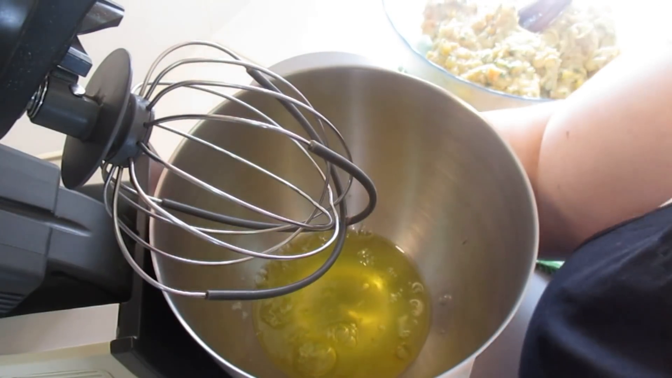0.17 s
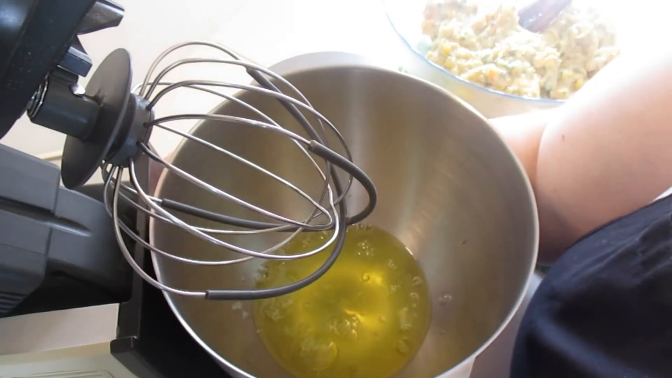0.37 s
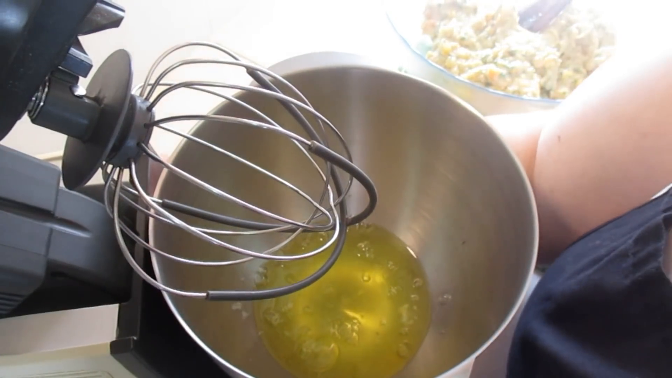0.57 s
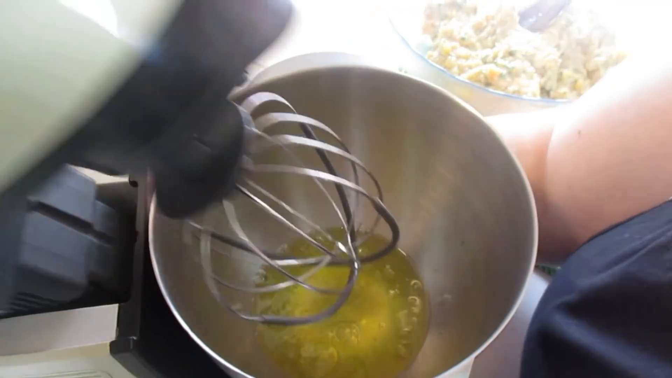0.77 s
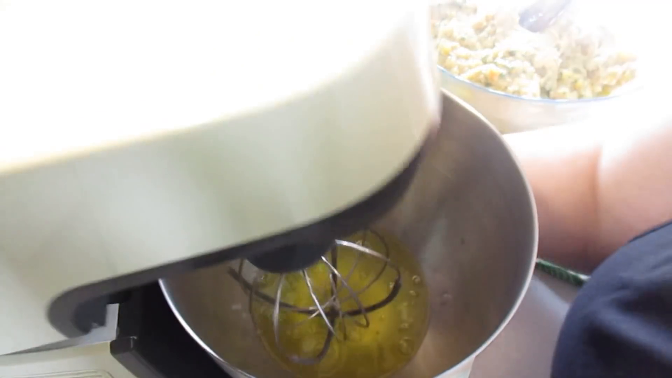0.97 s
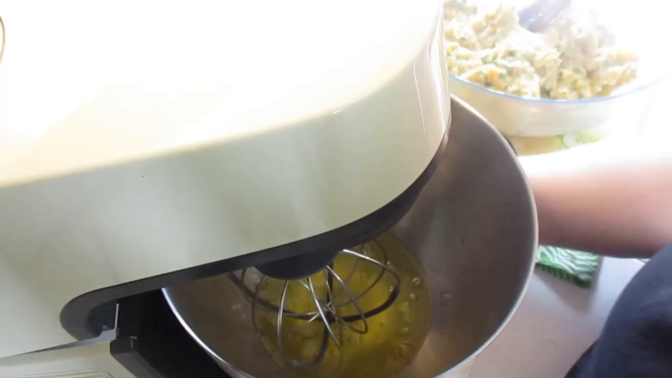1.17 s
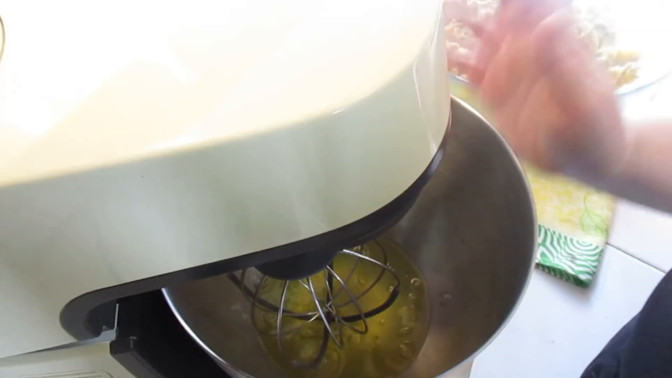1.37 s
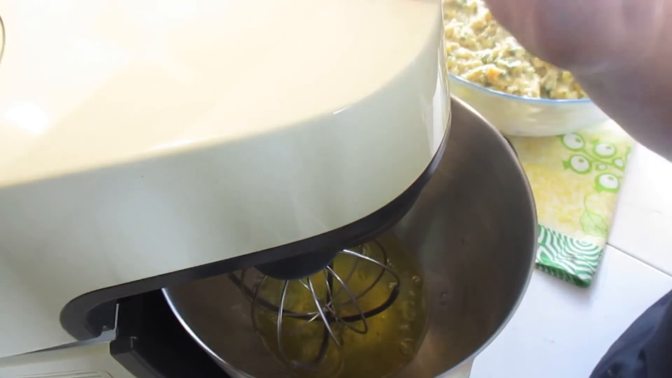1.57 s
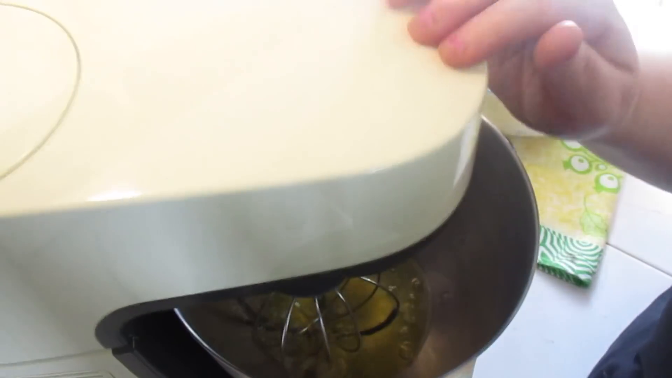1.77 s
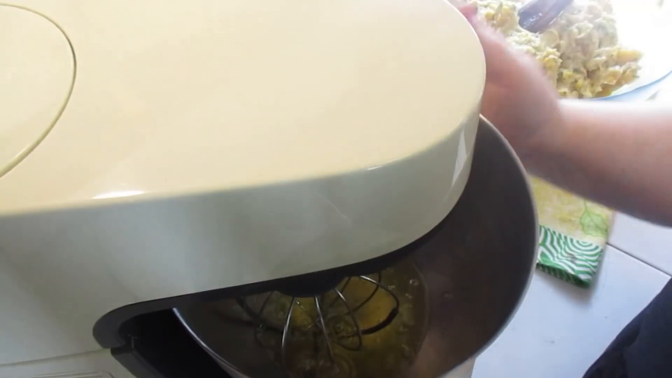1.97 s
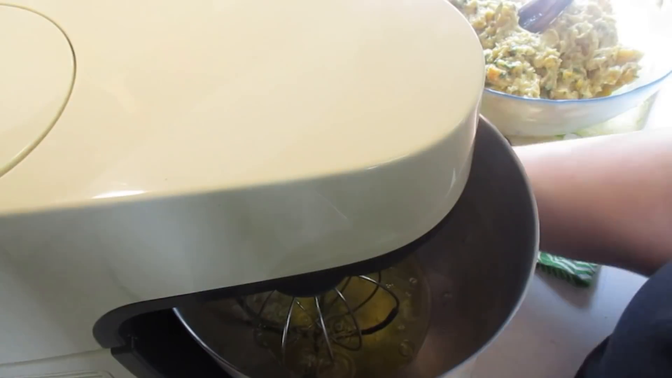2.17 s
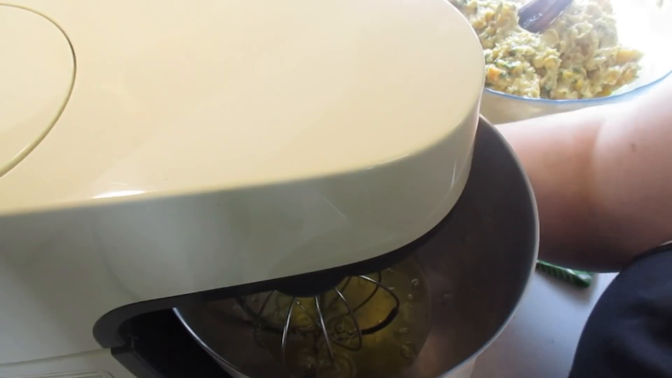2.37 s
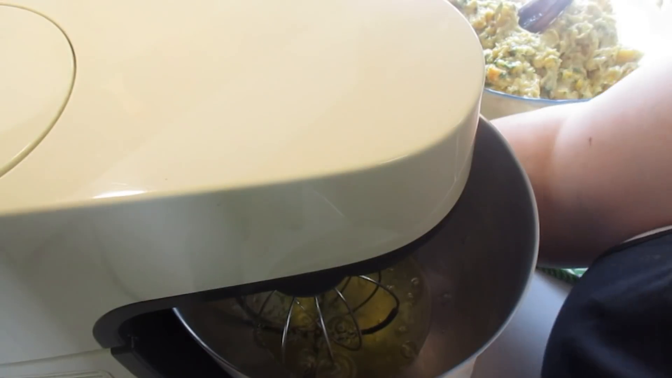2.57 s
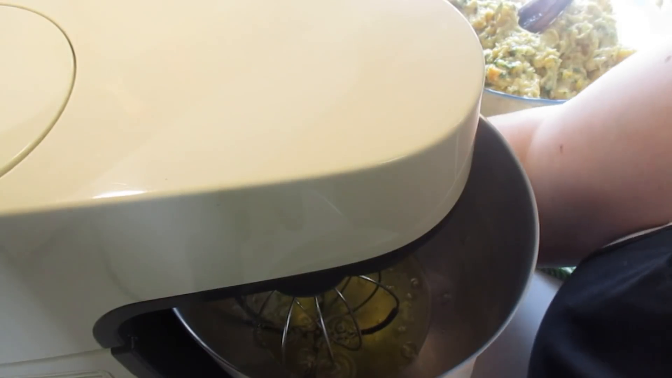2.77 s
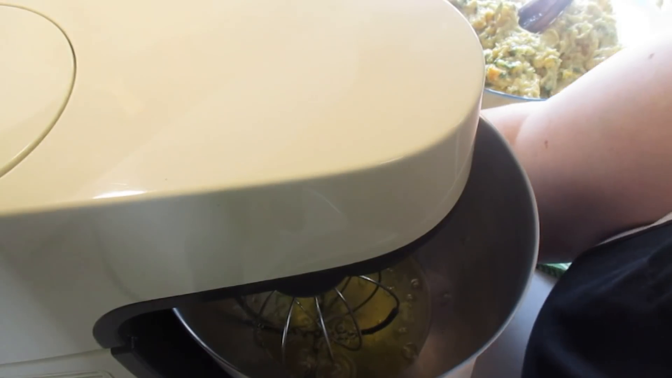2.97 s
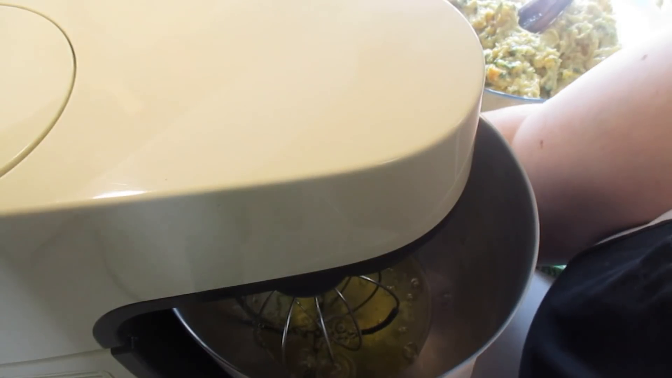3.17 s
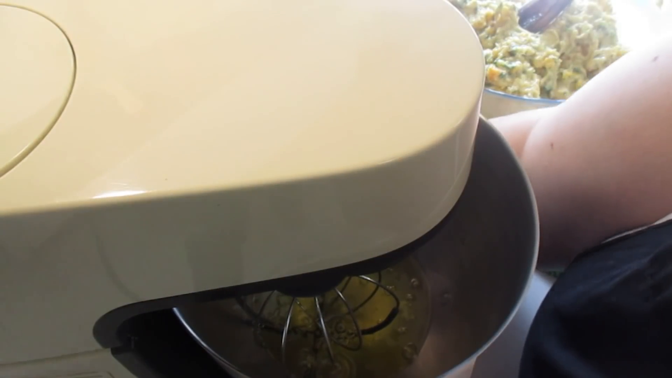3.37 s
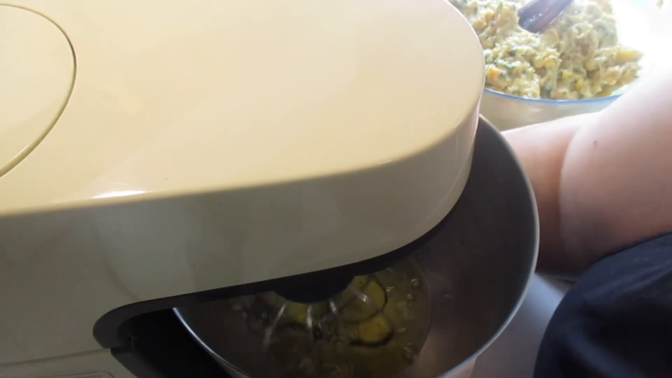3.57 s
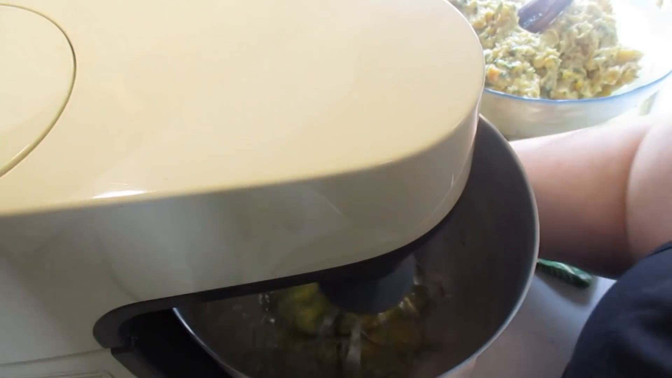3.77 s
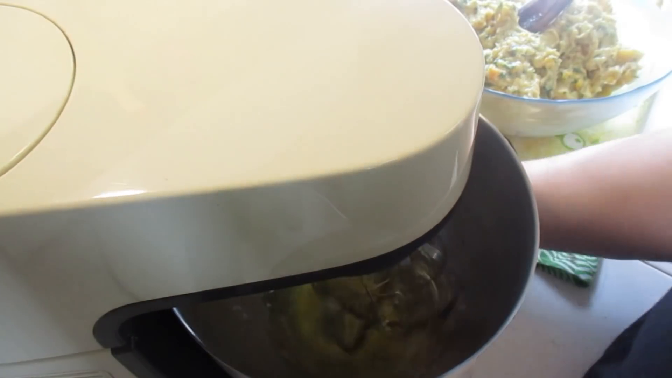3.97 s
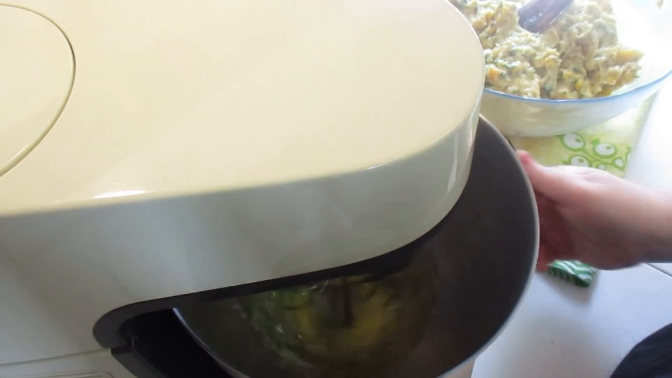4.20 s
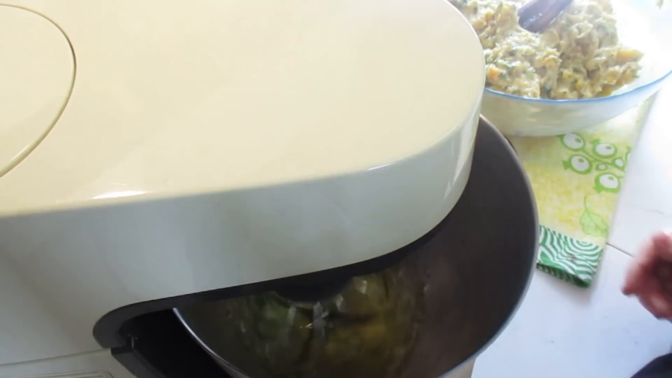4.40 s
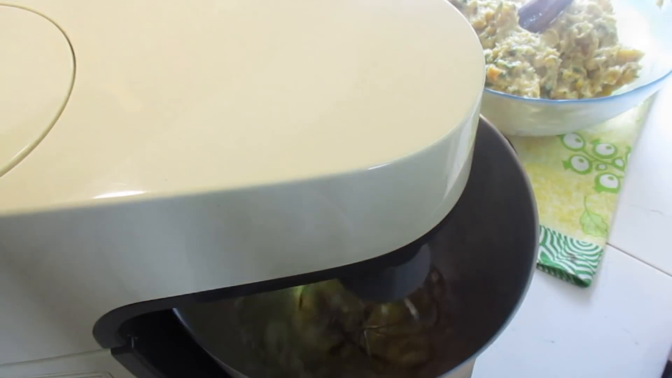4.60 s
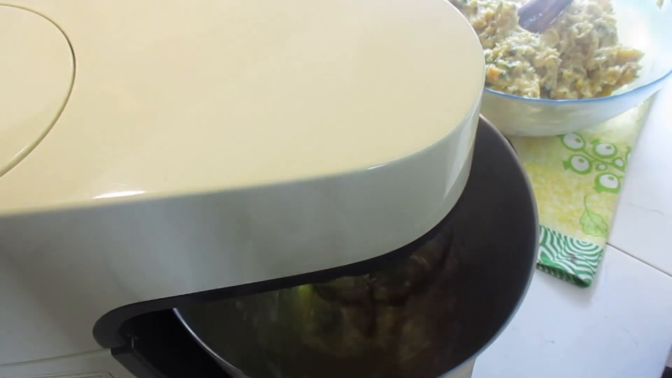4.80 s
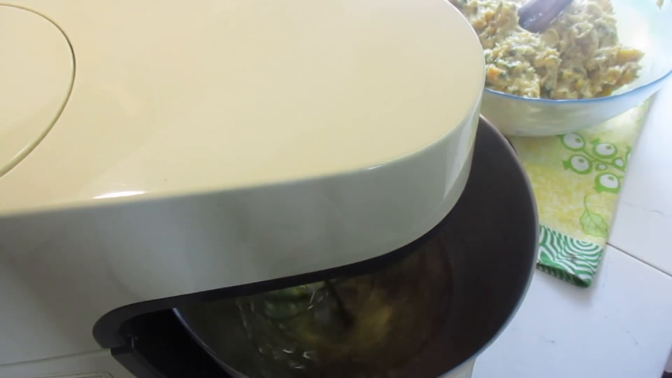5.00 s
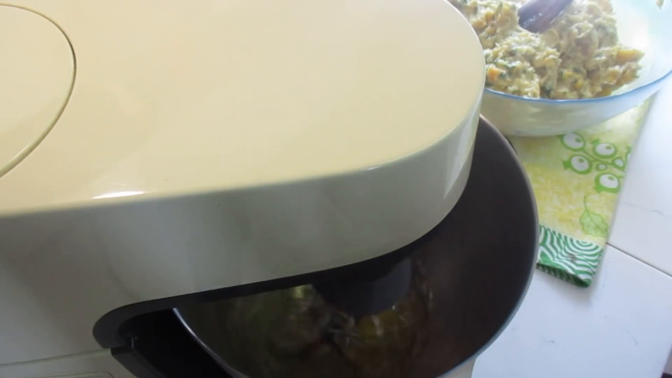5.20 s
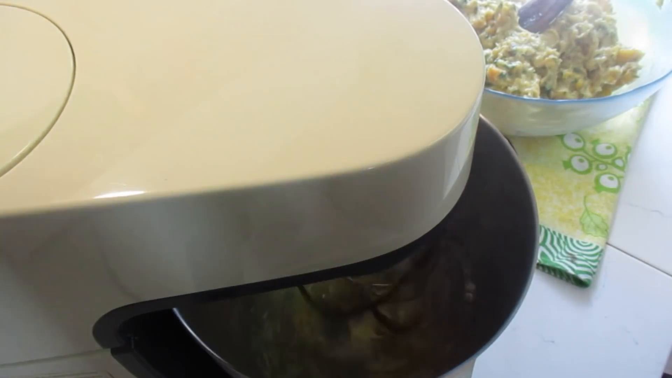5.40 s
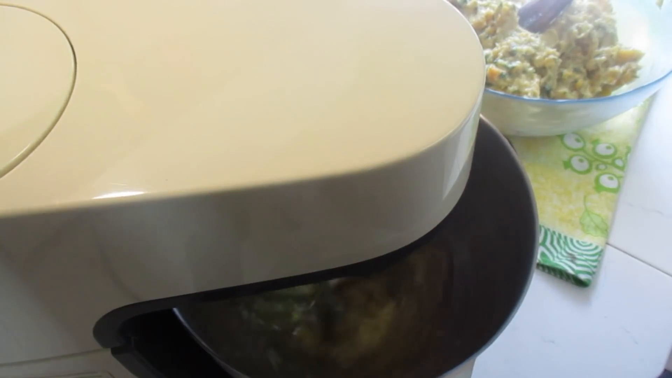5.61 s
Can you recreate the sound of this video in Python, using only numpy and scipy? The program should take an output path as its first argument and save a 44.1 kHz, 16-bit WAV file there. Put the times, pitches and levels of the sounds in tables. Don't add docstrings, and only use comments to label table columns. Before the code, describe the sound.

Hand rubs and light cloth rustle accompany dull plastic and metal knocks as a stand mixer head drops and latches, the latch being the loudest hit and slightly clipped. After a nearly silent gap come small lever clunks, then a geared motor starts with a jerk, growling and whining higher. Close single microphone, same in both channels, small kitchen with short reverberation and faint hiss.

```python
import sys
import numpy as np
from scipy import signal
from scipy.fft import rfft, irfft, next_fast_len
from scipy.io import wavfile
from scipy.ndimage import uniform_filter1d, map_coordinates

SR = 44100
rng = np.random.default_rng(int(sys.argv[2]) if len(sys.argv) > 2 else 0)


def persist_wave(psi):
    counts = np.round(np.clip(psi, -1, 1) * 32767).astype(np.int16)
    wavfile.write(sys.argv[1], SR, np.atleast_2d(counts).T)


def voltage_ratio(decibels):
    exponent = np.asarray(decibels, float) / 20
    return 10 ** exponent


N = 249165
T = np.arange(N) / SR


def unit(x):
    return x / np.sqrt(np.mean(x ** 2) + 1e-20)


def along(points, hz):
    f, v = np.transpose(points)
    return np.interp(np.log(hz + 1), np.log(f + 1), v)


def curve(points):
    s, value = np.transpose(points)
    return np.interp(T, s, value)


def wobble(rate_hz):
    at = np.arange(0, N + 8, 8)
    knots = rng.standard_normal(N // 40)
    return np.interp(np.arange(N), at, map_coordinates(knots, [at * rate_hz / SR]))


def filtered(x, response):
    m = next_fast_len(len(x) + 8192)
    return irfft(rfft(x, m) * response(np.fft.rfftfreq(m, 1 / SR)), m)[:len(x)]


def modes(table):
    def response(f):
        return sum((-1) ** k * voltage_ratio(db) * 1j * f * width / (centre * centre - f * f + 1j * f * width)
                   for k, (centre, width, db) in enumerate(table))
    return response


def peaks(table):
    def response(f):
        return np.sqrt(sum(voltage_ratio(db) ** 2 / (1 + (2 * (f - centre) / width) ** 2)
                           for centre, width, db in table))
    return response


def coloured(spectrum, grit_db, rate, body=None, ring_db=0, patchy_db=1):
    z = signal.stft(rng.standard_normal(N) * voltage_ratio(grit_db * wobble(rate)), nperseg=512)[2]
    patches = uniform_filter1d(rng.standard_normal(z.shape), size=3, axis=0)
    patches = uniform_filter1d(patches, size=12, axis=1)
    x = signal.istft(z * voltage_ratio(patchy_db * unit(patches)), nperseg=512)[1][:N]

    def response(hz):
        ring = 1 + voltage_ratio(ring_db) * peaks(body)(hz) if body else 1
        return voltage_ratio(along(spectrum, hz)) * ring
    return unit(filtered(x, response))


def tones(table, turns, swing_db, rate, drift):
    return sum(voltage_ratio(db + swing_db * wobble(rate)) * np.sin(2 * np.pi * k * turns + drift * wobble(rate))
               for k, db in table)


def swells(rows, floor_db):
    power = sum(voltage_ratio(db - 10 * np.where(T < s, (s - T) / rise, (T - s) / fall)) ** 2
                for s, db, rise, fall in rows)
    return np.sqrt(voltage_ratio(floor_db) ** 2 + power)


# t/s, commutator bar rate f/Hz
SPEED = [(3.46, 150), (3.58, 380), (3.68, 510), (3.8, 610), (3.9, 641), (4, 647), (4.14, 624), (4.3, 612),
         (4.45, 628), (4.58, 670), (4.79, 732), (5, 784.5), (5.14, 814.5), (5.35, 856.5), (5.65, 926)]
SWITCH_S, SHAFT_PER_BAR = 3.458, .155


def motor():
    speed_hz = curve(SPEED)
    bars = np.cumsum(speed_hz * (1 + .0007 * wobble(30))) / SR
    worm = np.sin(2 * np.pi * SHAFT_PER_BAR * bars + wobble(12))
    growl_db, rattle_db, hiss_db, hum_db = motor_levels(speed_hz)
    sound = gear_noise(worm, growl_db, rattle_db) + brush_hiss(bars, hiss_db)
    sound += commutator_whine(bars, worm, hiss_db) + gear_mesh(bars, rattle_db, hiss_db)
    sound += field_hum(bars, worm, hum_db)
    return np.clip((T - SWITCH_S) / 0.0042, 0, 1) * sound


# t/s, level/dB
LOAD = [(3.46, -24), (3.56, -16), (3.7, -15.5), (3.8, -18), (3.92, -15), (4.01, -11.5), (4.09, -16),
        (4.25, -15), (4.42, -17.5), (4.62, -17.5), (4.75, -12.5), (4.84, -14), (5.0, -17), (5.08, -22),
        (5.22, -22.5), (5.42, -14.5), (5.56, -13), (5.65, -20)]
HUM_DB, MEAN_EFFORT_DB, MESHED_HZ = -33.5, -17, 520


def motor_levels(speed_hz):
    effort = curve(LOAD) - MEAN_EFFORT_DB
    speed_db = 20 * np.log10(speed_hz / MESHED_HZ)
    slow, fast = np.minimum(speed_db, 0), np.maximum(speed_db, 0)
    growl_db = -22 + 0.64 * effort + 0.8 * fast + .5 * wobble(14)
    rattle_db = -19.5 + 0.85 * effort + 3.1 * slow + 0.39 * wobble(14)
    hiss_db = -28.5 + 0.58 * effort + 1.9 * slow + 0.78 * fast + 0.23 * wobble(12)
    hum_db = HUM_DB + 0.27 * effort - 0.45 * fast + 0.89 * wobble(16)
    return growl_db, rattle_db, hiss_db, hum_db


# f/Hz, level/dB per Hz
GROWL = [(24, -63), (40, -46), (118, -2.5), (161, -12), (341, -1.5), (438, -6.5), (491, 1.5), (715, -11),
         (800, -3), (1040, -31.5), (1760, -120)]
# f/Hz, level/dB per Hz
RATTLE = [(350, -58), (600, 1.5), (748, -13.5), (916, 5), (1020, 0), (1220, 2.5), (2400, -21), (3120, -37),
          (5280, -120)]
# f/Hz, width/Hz, level/dB
HOUSING = [(239, 12, -4), (268, 49, -8), (346, 41, -8), (400, 12, -5), (500, 29, -6.5), (655, 45, -4),
           (841, 17, -1), (930, 60, 2.5), (1100, 100, 1), (1248, 55, 3), (1356, 13, 3), (1584, 136, -0.5),
           (1697, 14, -2), (1970, 26, -2), (2180, 45, 1.5), (2600, 110, 0.5), (3100, 89, 3.5)]


def gear_noise(worm, growl_db, rattle_db):
    growl = voltage_ratio(growl_db) * coloured(GROWL, grit_db=0.5, rate=160, body=HOUSING, ring_db=13.5, patchy_db=1.35)
    rattle = coloured(RATTLE, grit_db=1.0, rate=180, body=HOUSING, ring_db=13.0, patchy_db=1.5)
    return (1 + 0.19 * worm) * (growl + voltage_ratio(rattle_db - 2.0) * rattle)


# f/Hz, level/dB per Hz
HISS = [(1060, -14.5), (1800, 0.5), (2280, -8.5), (2570, -4), (3050, -6.5), (3800, -9), (5220, -10),
        (9880, -13.5), (10900, -17.5), (13000, -22), (15900, -31)]
# f/Hz, width/Hz, level/dB
BOWL = [(4360, 100, 2.5), (4870, 100, 1), (5330, 90, 2.5), (6000, 110, 1), (6780, 100, -0.5),
        (7250, 190, 2), (7770, 45, 5), (8230, 90, 1), (8820, 74, 3), (9740, 91, 2), (10200, 60, 2),
        (11420, 70, 3.5), (12500, 170, -1), (13100, 90, -1)]


def brush_hiss(bars, hiss_db):
    beat = voltage_ratio(0.79 * np.sin(2 * np.pi * 0.027 * bars))
    noise = coloured(HISS, grit_db=1.0, rate=270, body=BOWL + HOUSING, ring_db=-1.0, patchy_db=1.5)
    hiss = voltage_ratio(hiss_db + 0.5) * beat * noise
    top = filtered(hiss, lambda hz: 1 / (1 + (7500 / (hz + 1)) ** 6))
    return hiss - top * np.clip((3.68 - T) / 0.11, 0, .85)


BARS = [4, 5, 6, 7, 8, 9, 10, 11, 12, 13, 14, 15, 16, 18, 20, 21]
BARS_DB = [-60, -63, -45.5, -52, -47, -50, -47.5, -54, -48, -52, -49, -55.5, -51, -53, -60, -62]
# f/Hz, width/Hz, level/dB
SHELL = [(4400, 300, -2), (4900, 450, 0), (5330, 250, 3.5), (6750, 400, 5.5), (7350, 350, 4),
         (8100, 250, 0), (8750, 250, -2), (9800, 300, 3), (10350, 250, -1), (11500, 300, 0),
         (12550, 300, -2), (13400, 300, -7), (15200, 400, -9)]


def commutator_whine(bars, worm, hiss_db):
    whine = tones(zip(BARS, BARS_DB), bars, swing_db=3.5, rate=22, drift=.8)
    whine *= voltage_ratio(hiss_db + 30.5) * np.clip((T - 3) / 1.6, 0, 1) * (1 + .9 * worm)
    return filtered(whine, peaks(SHELL))


# multiple of bar rate, level/dB
GEARS = [(.152, -32), (.455, -23), (.61, -33)]
# multiple of bar rate, level/dB
PINION = [(2.17, -29), (4.3, -46)]
# multiple of bar rate, level/dB
HIGH_SPEED = [(.305, -31), (2, -37), (4, -46)]
# peak t/s, level/dB, rise/s, fall/s
WORM_SINGS = [(4.85, 9, 0.36, .25), (5.42, 9.6, 0.17, 0.38), (5.56, 13, 0.49, 0.075)]
# peak t/s, level/dB, rise/s, fall/s
WHEEL_SINGS = [(3.65, -22, .15, .2), (4.73, 6, 0.094, 0.18), (4.97, 10, 0.12, 0.11)]
# peak t/s, level/dB, rise/s, fall/s
IDLER_SINGS = [(4.55, 11, 0.13, .12), (5.0, 7.3, .2, .2)]
# peak t/s, level/dB, rise/s, fall/s
PINION_SINGS = [(3.72, 2, 0.32, 0.2), (4.5, 0.5, 0.17, 0.36), (4.83, -3.5, 0.34, 0.14),
                (5.25, -2, .3, 0.21)]
# peak t/s, level/dB, rise/s, fall/s
HIGH_SPEED_SINGS = [(4.95, -11, .4, 0.23), (5.56, -2.5, 0.31, .3)]


def gear_mesh(bars, rattle_db, hiss_db):
    shafts = sum(tones([order], bars, swing_db=2.5, rate=30, drift=0.96) * swells(rows, -11.5)
                 for order, rows in zip(GEARS, (WORM_SINGS, WHEEL_SINGS, IDLER_SINGS)))
    pinion = tones(PINION, bars, swing_db=5, rate=70, drift=2.2) * swells(PINION_SINGS, -14)
    field = tones(HIGH_SPEED, bars, swing_db=5.5, rate=26, drift=0.9) * swells(HIGH_SPEED_SINGS, -4.5)
    mesh = voltage_ratio(rattle_db + 21.5) * shafts + voltage_ratio(rattle_db + 24) * pinion + voltage_ratio(hiss_db + 35) * field
    return filtered(mesh, lambda hz: 0.13 + peaks(HOUSING)(hz))


# f/Hz, level/dB over the hum
MAINS = [(100.3, -1.5), (199.3, -11), (300.5, -3.5), (500.5, 7.5)]
# peak t/s, level/dB, rise/s, fall/s
STAND_SINGS = [
    (3.6, -6, 0.17, 0.087),
    (4.0, 1.5, 0.099, 0.11),
]


def field_hum(bars, worm, hum_db):
    fade_db = -6.5 * np.clip((T - 4.18) / 0.033, 0, 1)
    hum = voltage_ratio(hum_db + fade_db) * tones(MAINS[:-1], T, swing_db=-5.0, rate=6, drift=0.79)
    shudder = np.sin(2 * np.pi * .031 * bars + 2 * worm)
    hz, db = MAINS[-1]
    fifth = voltage_ratio(db) * np.sin(2 * np.pi * hz * T + 1.3 * shudder)
    return hum + voltage_ratio(HUM_DB) * swells(STAND_SINGS, -27) * fifth


# t/s, peak level/dB, boom level/dB, crack level/dB, ring f/Hz
TIP = [(.203, -17, -13.5, -6.5, 1500), (.207, -20, -20, -10, 1100), (.453, -24, -2.5, -16, 1140),
       (.459, -26.5, -1, -31, 1080), (.483, -34, 2, -25, 1080), (.56, -19, -15, -13, 1230),
       (.566, -22, 5, 7, 2600), (.576, -12.5, -2, -25, 800), (0.581, -5.5, -6, -7, 604),
       (.59, -10.5, -8, -24, 712), (.651, -39, -8, 12, 3400), (.661, -19, -9, -14, 1194),
       (0.687, -26, 2, -25, 630), (0.713, -26.5, -9, -18, 1160), (0.732, -13, -28, -23, 1410),
       (.738, -11, -5, -13, 1350), (.741, -11, -25, -28, 638), (.757, -26, -10, -27, 600),
       (.809, -39, 11, -18, 511), (.873, -28.5, -1, -17, 890), (.94, -36, 12, -25, 660),
       (1.118, -33, 5, -26, 715), (1.127, -25, -0.5, -30, 656), (1.153, -29, 0.5, -25, 667),
       (1.22, -37, -3.5, -3, 1060), (1.384, -41, -13, -4, 890)]
# t/s, peak level/dB, boom level/dB, crack level/dB, ring f/Hz
LOCK = [(1.586, -34.5, 5, 7, 634), (1.606, -30, 2, -20.5, 960), (1.638, -24, -12, -0.5, 730),
        (1.647, -3, -9.5, -18, 1020), (1.662, -21.5, -3, -30, 1180), (1.689, -25, 4.5, -28, 400),
        (1.702, -27, -6.5, -24, 1260), (1.721, -18.5, -18, 6, 641), (1.723, -11, 6, -9, 425),
        (1.732, -11, -9, 4.5, 2490), (1.735, -13, -12, -1, 6360), (1.742, -17, -5, -20, 1030),
        (1.75, -7.5, -12, -12, 788), (1.758, 2, -5, -10, 1360), (1.764, 2, -16, -15, 920)]
# t/s, peak level/dB, boom level/dB, crack level/dB, ring f/Hz
LEVER = [(2.625, -45, 6.5, -2, 3380), (2.71, -44.5, 1, -1, 3750), (2.805, -48, 16, 11.5, 600),
         (2.853, -27, 6.5, 8.5, 705), (2.885, -24.5, 4, 6.5, 930), (2.899, -28.5, 6.5, -25, 322),
         (2.941, -40.5, 9, 15, 634), (2.997, -30.5, -9, 12.5, 590), (3.005, -26.5, 9, -25, 332),
         (3.022, -39, 6, -25, 320), (3.037, -13.5, -1.5, -2, 460), (3.043, -11, 5, -14, 277),
         (3.052, -18, 1, -25, 306), (3.182, -33, -5, -20, 494), (3.211, -35.5, 4, 4, 1520),
         (3.232, -34, 4, -20, 320)]
# t/s, peak level/dB, boom level/dB, crack level/dB, ring f/Hz
JERKS = [
    (3.459, -12.5, -2, -9.5, 500),
    (3.503, -18, -7, -9, 1130),
    (3.545, -21, -4, -20.5, 500),
    (3.592, -16, -6, -14, 550),
]
CONTACT_S = (0.021, 0.013, 0.028, 0.035)
SOFT_HZ = 5700, 9900, 15200, 6560
SNAP_SHARE = (1, 0.9, 0.52, 1)
DETENT_DB = (-19, 4, -5, 1)
# t/s, peak level/dB, f/Hz
THUMPS = [
    (0.58, -11, 96),
    (1.213, -13, 70),
    (1.755, -18.5, 91),
    (2.489, -40, 86.6),
    (3.099, -19, 59.2),
    (3.829, -32, 88.8),
]


def knocks():
    out, t = np.zeros(N + SR), np.arange(SR // 3) / SR
    parts = zip((TIP, LOCK, LEVER, JERKS), CONTACT_S, SOFT_HZ, SNAP_SHARE, DETENT_DB)
    for rows, contact_s, soft_hz, snap, detent_db in parts:
        for s, db, boom_db, crack_db, ring_hz in rows:
            hit = contact(t, boom_db, crack_db, ring_hz, contact_s, soft_hz, snap, detent_db)
            out[round((s - .001) * SR):][:len(t)] += voltage_ratio(db) * (hit + voltage_ratio(-11) * room(hit))
    for s, db, hz in THUMPS:
        thump = np.sin(2 * np.pi * hz * t) * (1 - np.exp(-t / 0.0063))
        out[round(s * SR):][:len(t)] += voltage_ratio(db - 3.0 - 60 * t / 0.062) * thump
    return out[:N]


# f/Hz, width/Hz, level/dB
CLACK = [(641, 68, 3.5), (940, 104, -2), (1080, 187, 5), (1220, 537, 0.5), (1800, 640, -6.5),
         (2980, 700, -17.5)]
# f/Hz, width/Hz, level/dB
BOOM = [(297, 55, 2.5), (410, 39, -2), (483, 38, -9)]
# f/Hz, level/dB
CRACK = [(900, -10), (1800, 5.5), (3000, -0.5), (5000, -5.5), (8000, -11.5), (11000, -17.5), (13000, -16),
         (16000, -36)]
# f/Hz, width/Hz, level/dB
DETENT = [(2580, 470, -10.5), (5630, 900, 2), (8300, 900, 1.5), (10200, 1400, 8), (14500, 1500, -0.5)]


def contact(t, boom_db, crack_db, ring_hz, contact_s, soft_hz, snap, detent_db):
    fade = voltage_ratio(-30 * t / contact_s)
    burst = rng.standard_normal(len(t)) * fade * (1 - np.exp(-t / 0.0018))
    burst[50] += 3.5
    push = rng.standard_normal(len(t)) * fade * (1 - np.exp(-t / 0.00096))
    spikes = burst * voltage_ratio(-30 * t / contact_s * (1 / snap - 1)) * rng.exponential(size=len(t))

    def part(response, x):
        y = filtered(x, response)
        return y / np.abs(y).max()

    def dull(table):
        return lambda f: modes(table)(f) / (1 + 1j * f / soft_hz) ** 2

    def ring(f):
        return modes([(ring_hz, 70 + .05 * ring_hz, 0)])(f) ** 2

    def crack(hz):
        spring = .5 + voltage_ratio(detent_db) * peaks(DETENT)(hz)
        return voltage_ratio(along(CRACK, hz)) / (1 + (hz / soft_hz) ** 2) * spring

    hit = 0.7 * part(dull(CLACK), burst)
    hit += 0.5 * part(ring, burst * voltage_ratio(-45 * t / contact_s))
    hit += voltage_ratio(boom_db) * part(dull(BOOM), push)
    return hit + voltage_ratio(crack_db) * part(crack, spikes)


# f/Hz, t60/s
KITCHEN = [(200, 0.24), (1000, 0.21), (4000, 0.2), (12000, 0.13)]


def room(x):
    hz, t, z = signal.stft(rng.standard_normal(len(x)), SR, nperseg=256)
    decay = voltage_ratio(-60 * t / along(KITCHEN, hz)[:, None])
    tail = signal.istft(z * decay, SR, nperseg=256)[1]
    return signal.fftconvolve(np.pad(x, (260, 0)), tail / np.linalg.norm(tail))[:len(x)]


# peak t/s, level/dB, rise/s, fall/s
STROKES = [
    (.5, -46, .4, 0.18),
    (.78, -34, 0.076, 0.27),
    (.95, -36, 0.15, .1),
    (1.14, -37, 0.045, 0.049),
    (1.76, -32.5, 0.11, 0.092),
    (2.87, -40, 0.053, 0.099),
    (3.07, -33, 0.028, 0.072),
]
# f/Hz, level/dB per Hz
SLIDE = [(88, -59), (150, -49), (178, -19), (304, -5.5), (436, -15), (639, -13), (876, -14), (1010, -14.5),
         (2200, -35.5), (2860, -65), (4840, -120)]
# peak t/s, level/dB, rise/s, fall/s
RUSTLES = [
    (.35, -56, 0.078, 0.041),
    (.8, -47.5, 0.069, 0.14),
    (1.17, -53.5, 0.044, 0.18),
    (1.76, -36, 0.02, 0.034),
    (2.88, -48, 0.035, 0.059),
    (3.04, -51, .05, 0.053),
]
# f/Hz, level/dB per Hz
CLOTH = [(1200, -38), (2500, 2), (5000, -6), (7500, -1.5), (10000, -8), (15900, -26)]


def hands(duck_db):
    slide = coloured(SLIDE, grit_db=1.0, rate=70, body=BOOM, ring_db=-19)
    cloth = coloured(CLOTH, grit_db=1.5, rate=65, patchy_db=5.0)
    return swells(STROKES, -48.5 + 0.67 * duck_db) * slide + swells(RUSTLES, -120) * cloth


# f/Hz, level/dB per Hz
HUSH = [(880, -32), (1500, -7), (1710, -2.5), (2480, -6.5), (3720, -9.5), (4270, -9.5), (8440, -14),
        (12000, -21), (15900, -27)]
# f/Hz, level/dB over the hush
WHINE = [(11750, -17.5), (1310, -8), (2240, -13.5), (7250, -27)]
# f/Hz, level/dB per Hz
DRONE = [(12, -49), (20, -12.5), (38, -23), (81, -6), (167, -13), (178, -46), (200, -17), (260, -46.5),
         (440, -120)]
# peak t/s, level/dB, rise/s, fall/s
SHAKES = [
    (.57, -41, .3, 0.35),
    (1.15, -39.5, 0.32, 0.41),
    (1.76, -28.5, 0.1, 0.08),
    (2.46, -47, 0.11, 0.12),
    (2.85, -36.5, 0.056, 0.11),
]
HUSH_DB, DRONE_DB = -54, -50.5


def background(duck_db):
    hush = voltage_ratio(HUSH_DB + duck_db) * coloured(HUSH, grit_db=2.1, rate=45, patchy_db=0.7)
    whine = voltage_ratio(HUSH_DB + .6 * duck_db) * tones(WHINE, T, swing_db=.5, rate=5, drift=.3)
    drone = coloured(DRONE, grit_db=3.5, rate=12, patchy_db=-4.5)
    return hush + whine + swells(SHAKES, DRONE_DB + 0.28 * duck_db) * drone


DUCK_S, DUCK_DB, DUCK_IN_S, RECOVER_S = 1.833, -17, 0.053, 0.59


def gain_duck():
    since = np.maximum(T - DUCK_S, 0)
    return DUCK_DB * (1 - np.exp(-since / DUCK_IN_S)) * np.exp(-since / RECOVER_S)


def scene():
    duck_db = gain_duck()
    return np.tile(motor() + knocks() + hands(duck_db) + background(duck_db), (2, 1))


def short_part(x, s, chosen):
    at = round(s * SR) + np.arange(-700, 700)
    z, out = rfft(x[at]), np.zeros(N)
    lines = chosen(np.fft.rfftfreq(len(at), 1 / SR), np.abs(z))
    out[at] = signal.windows.tukey(len(at), .6) * irfft(z * lines)
    return out


def roll_off(x):
    return signal.sosfilt(signal.butter(12, 16020, fs=SR, output="sos"), x)


def record(dry):
    mix = dry / (1 + np.abs(dry) ** 8) ** (1 / 8)
    return roll_off(mix)


dry = scene()
out = record(dry)
persist_wave(out)
```